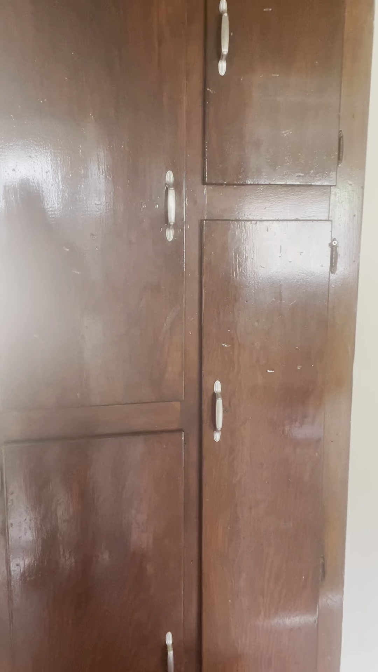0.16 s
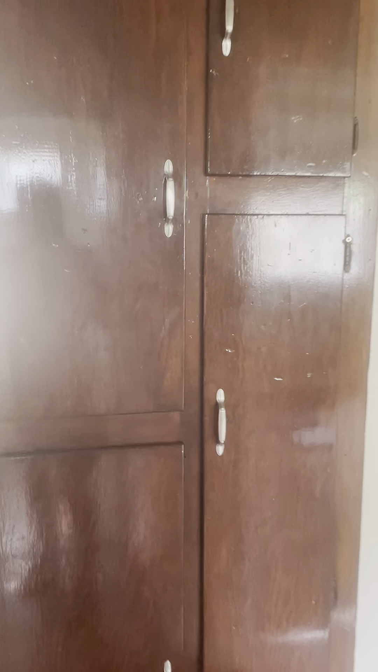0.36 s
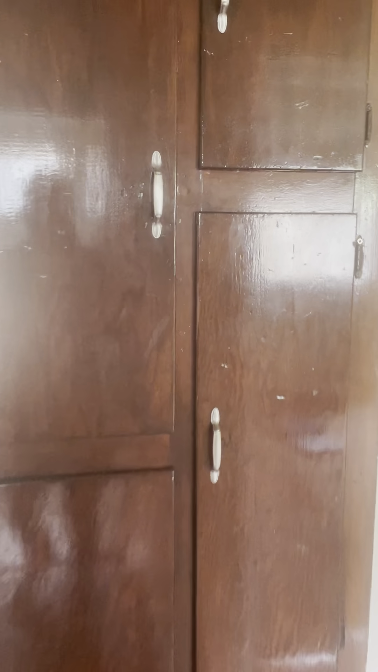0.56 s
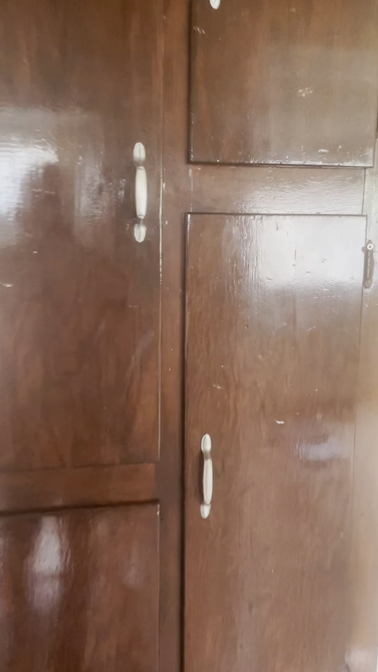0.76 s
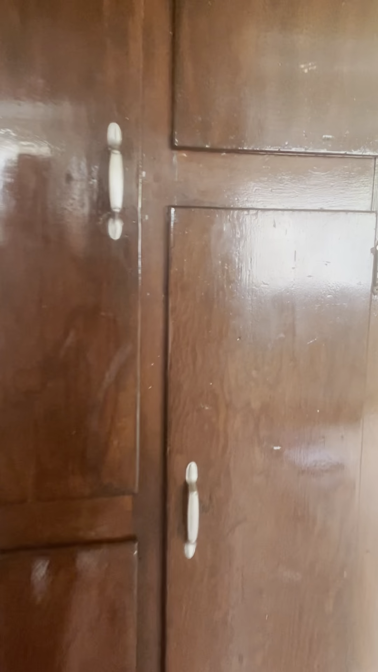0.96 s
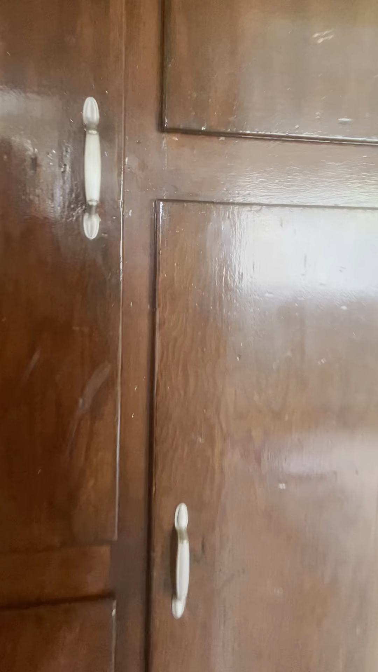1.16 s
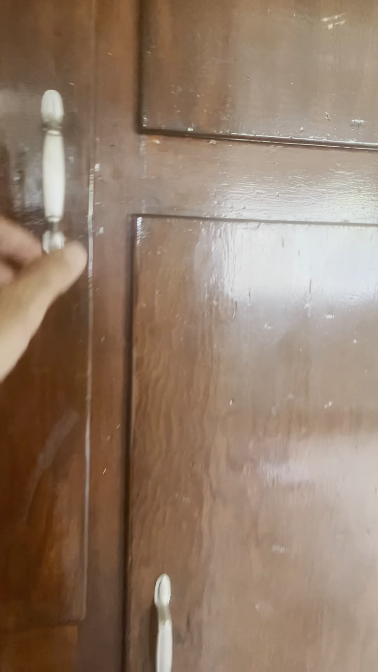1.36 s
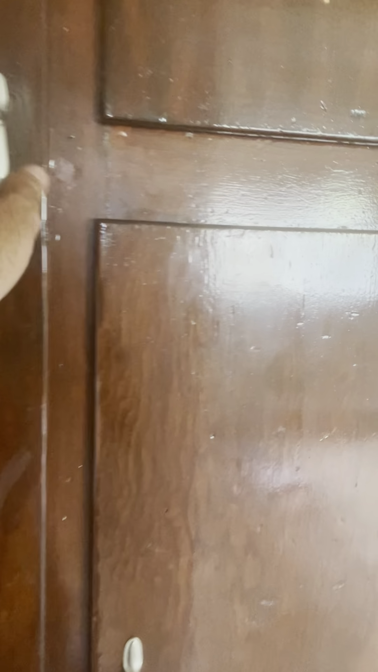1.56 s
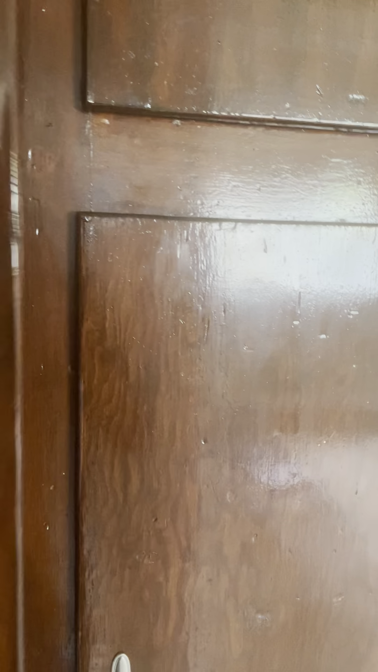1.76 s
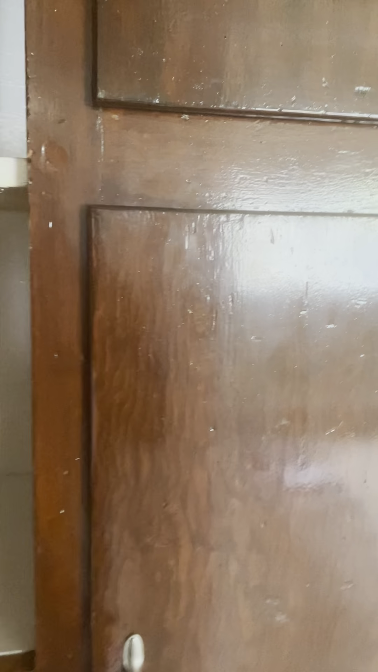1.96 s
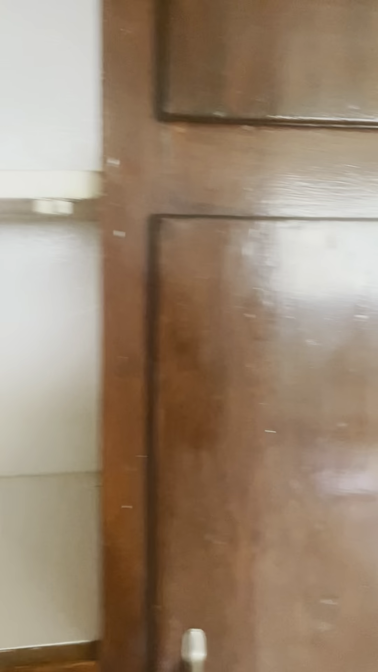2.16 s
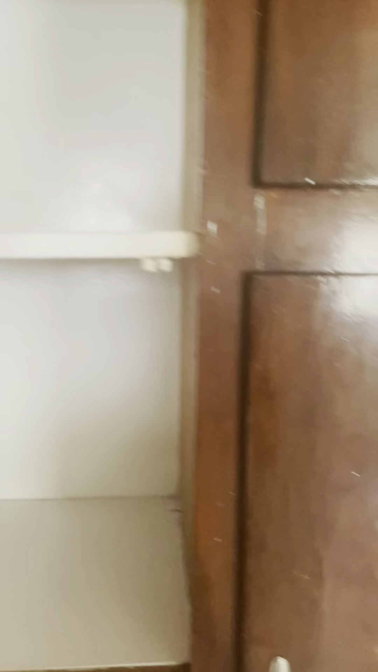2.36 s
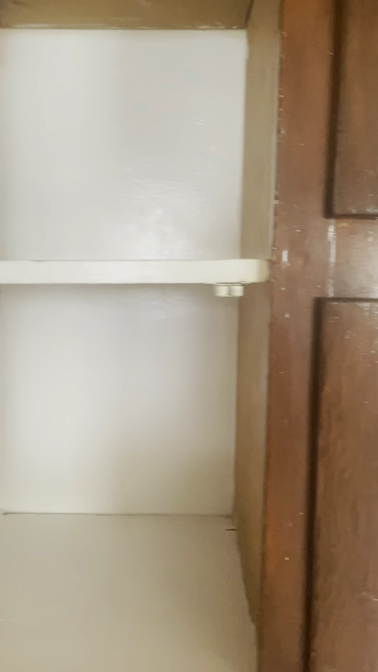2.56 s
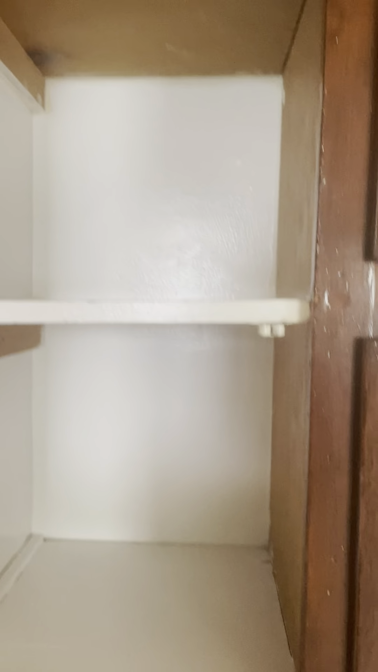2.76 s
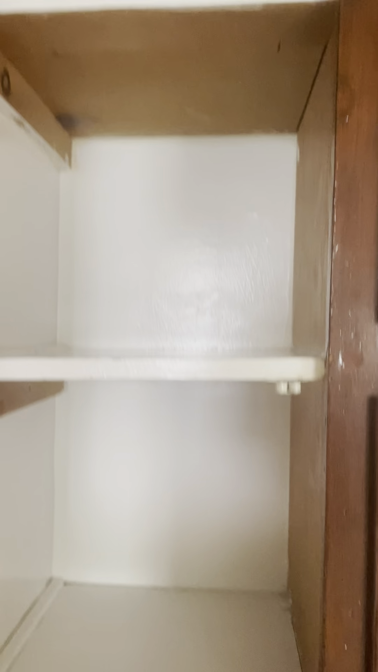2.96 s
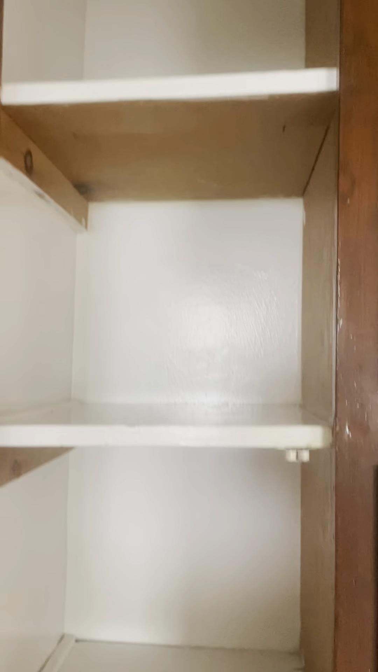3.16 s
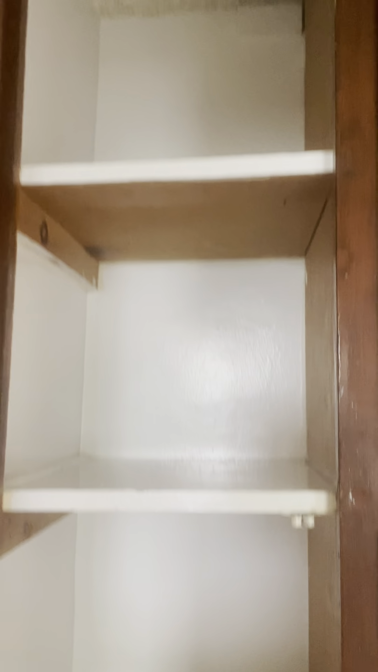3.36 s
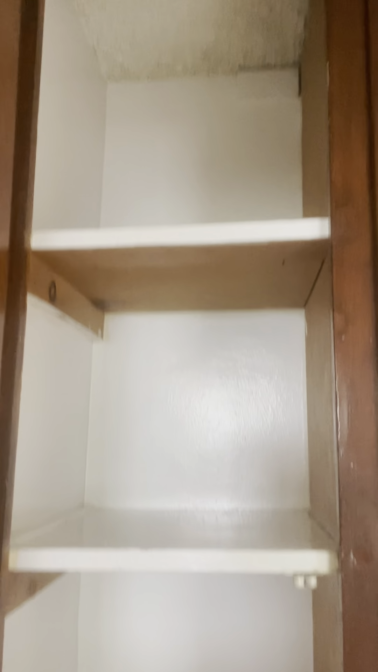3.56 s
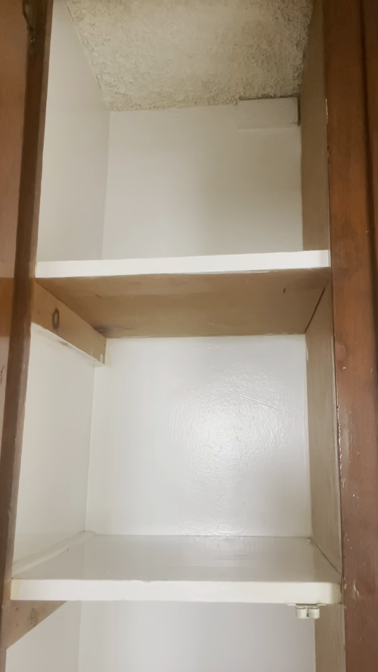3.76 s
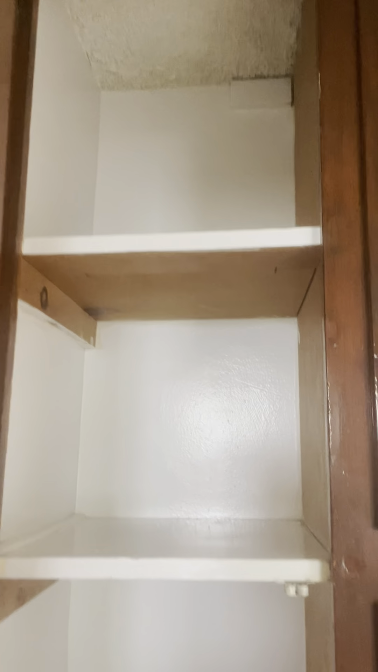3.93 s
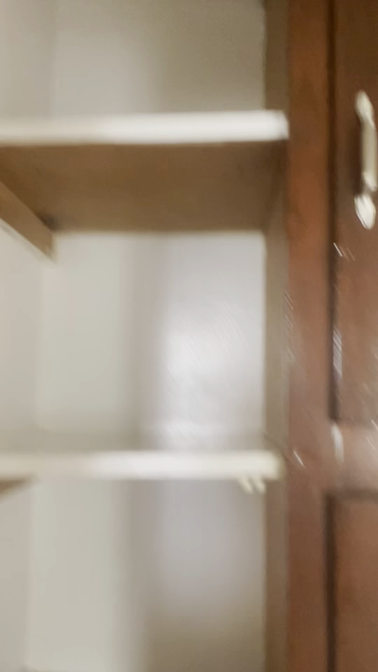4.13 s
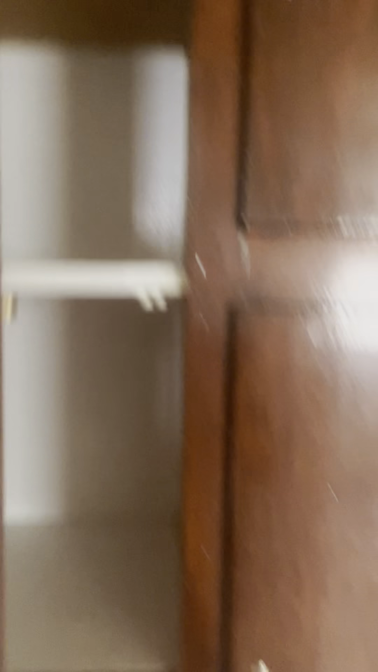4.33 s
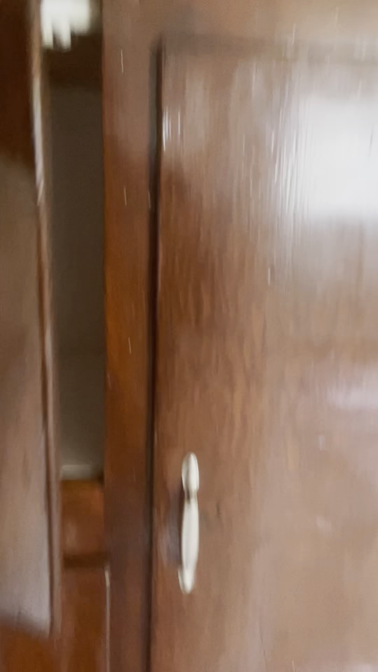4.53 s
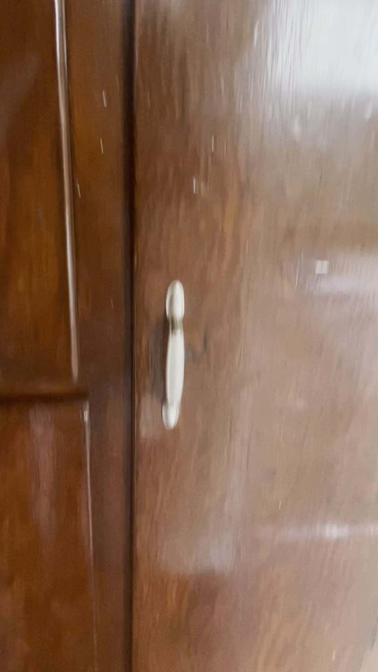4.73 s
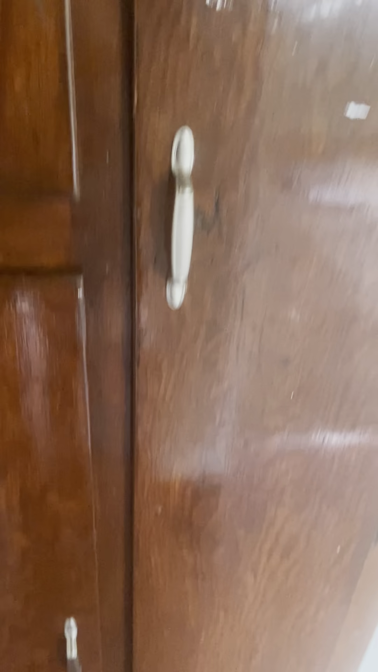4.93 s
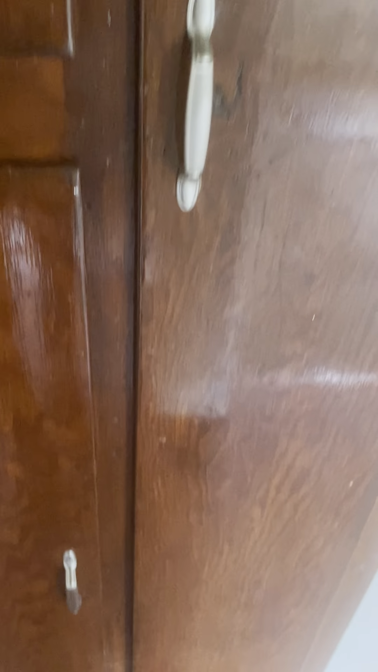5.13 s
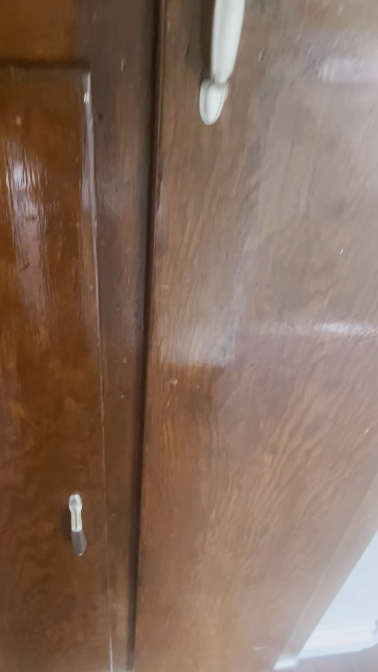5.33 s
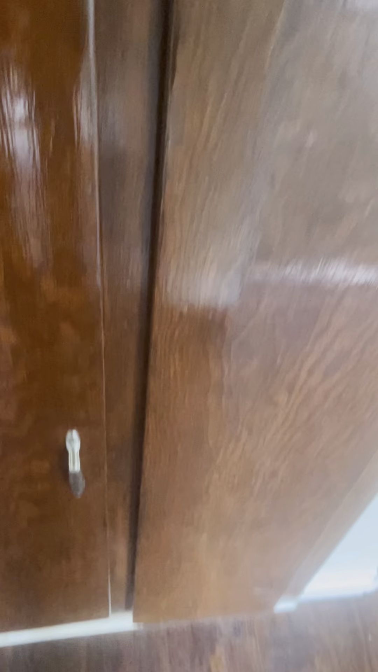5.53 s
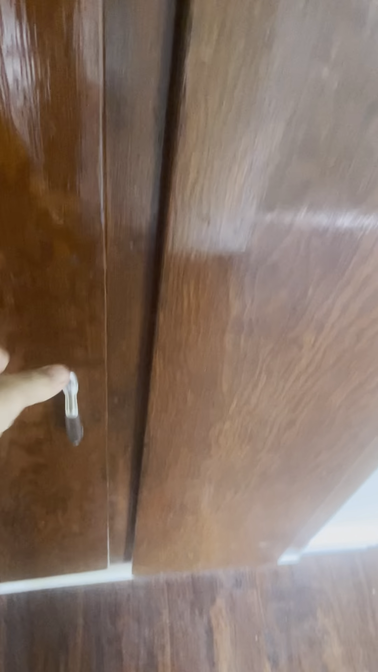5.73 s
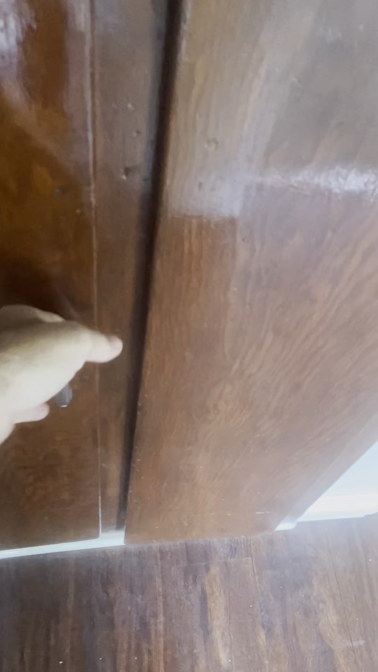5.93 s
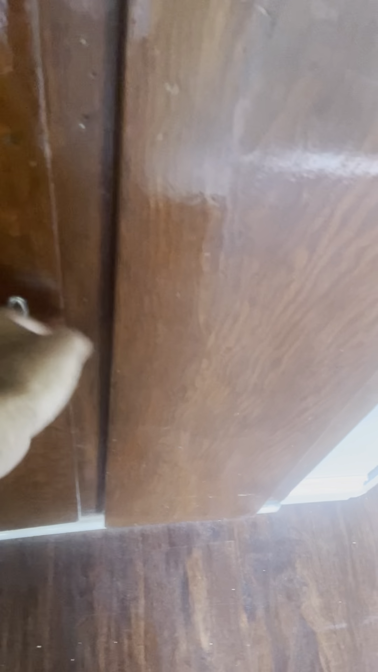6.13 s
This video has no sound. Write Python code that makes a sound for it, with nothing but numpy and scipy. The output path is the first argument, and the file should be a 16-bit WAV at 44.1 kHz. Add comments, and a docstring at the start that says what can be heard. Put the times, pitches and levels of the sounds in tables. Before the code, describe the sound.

In a bare, echoing room, floorboards tick and groan over a low house rumble. A cabinet door snaps off its catch with a bright clack, a quiet pause follows with tiny creaks, then the door bangs shut with a deep wooden boom. Another handle rattles lightly at the end. A sparrow chirps faintly outside. Close hand-held phone, stereo.

```python
"""A house rumbles and drones while floorboards groan and tick underfoot in a bare, echoing room.
Someone pulls a cabinet door off its catch, looks inside, bangs it shut, then takes another handle.
Sleeves and shoes rustle, and a sparrow chirps outside. Shaped noise makes the rumble and rustles,
ringing tones make the wood, a gliding tone makes the chirp, and decaying noise makes the echo.
Two microphone ports of a hand-held phone hear it all."""
import sys
import numpy as np
from scipy import signal
from scipy.fft import rfft, irfft, next_fast_len
from scipy.io import wavfile
from scipy.ndimage import uniform_filter1d

SR = 44100
rng = np.random.default_rng(int(sys.argv[2]) if len(sys.argv) > 2 else 0)


def bounce(signal):
    """Save signal as a 16-bit WAV file at the path given by the first command-line argument."""
    frames = np.transpose(np.atleast_2d(signal))
    limited = np.clip(frames, -1, 1)
    pcm = np.round(limited * 32767).astype(np.int16)
    wavfile.write(sys.argv[1], SR, pcm)


N = 277433  # length in samples


def amp(db):
    """Turns decibels into gain."""
    return 10 ** (np.asarray(db) / 20)


def unit(x):
    """Scales a sound to an rms (average strength) of 1."""
    return x / np.sqrt(np.mean(x ** 2) + 1e-20)


def along(points, hz):
    """Reads a curve of (Hz, value) points, with straight lines on a log frequency axis."""
    point_hz, value = np.transpose(points)
    return np.interp(np.log(hz + 1), np.log(point_hz + 1), value)


def filtered(x, response):
    """Multiplies the spectrum of x by a response that may change both level and timing."""
    size = next_fast_len(x.shape[-1] + 8192)  # spare room for ringing
    spectrum = rfft(x, size) * response(np.fft.rfftfreq(size, 1 / SR))
    return irfft(spectrum, size)[..., :x.shape[-1]]


def resonance(hz, width_hz):
    """Response of one resonance: 1 at its centre, weaker to either side."""
    return lambda f: 1j * f * width_hz / (hz * hz - f * f + 1j * f * width_hz)


# How the bare room echoes.
# Each row: frequency in Hz, time to fade by 60 dB in seconds, echo level in dB.
ROOM_ECHO = [(60, .9, -19.5), (170, 0.81, -4), (350, 0.83, -1), (715, 0.74, -1.5), (2000, 0.73, -1.5),
             (5000, 0.84, -6), (8000, 0.26, -3.5), (11700, 0.71, -9.5)]


def add(out, start_s, dry, echo_db, size=SR // 2):
    """Adds a sound and a fresh room tail; row 0 is common to both ports, row 1 differs."""
    hz, t, noise = signal.stft(rng.standard_normal((2, size)), SR, nperseg=256)
    room_hz, room_t60, room_db = np.transpose(ROOM_ECHO)
    t60 = np.interp(hz, room_hz, room_t60)[:, None]
    level_db = np.interp(hz, room_hz, room_db)[:, None]
    # dividing by the decay's own energy keeps long and short tails comparable
    gain = amp(level_db - 60 * t / t60) / np.sqrt(t60 * SR / (2 * np.log(1000)))
    gain = gain * (1 + 1.3 * amp(-60 * t / 0.21))  # the near walls answer first and louder
    tail = signal.istft(noise * gain, SR, nperseg=256)[1]
    tail = tail * (1 - np.exp(-np.arange(tail.shape[1]) / SR / 0.0025))  # the echoes build up
    sound = amp(echo_db) * signal.fftconvolve(dry[None], tail, axes=1)
    sound[0, :len(dry)] += dry
    start = round(start_s * SR)
    out[:, start:start + sound.shape[1]] += sound[:, :N - start]


def rush(spectrum, patchy_db):
    """Two unrelated noises with rms 1 overall, sharing patches of random gain in time and pitch."""
    noise = signal.stft(rng.standard_normal((2, N)), nperseg=512)[2]
    patches = uniform_filter1d(rng.standard_normal(noise.shape[1:]), 6, 0)
    patches = unit(uniform_filter1d(patches, 10, 1))
    pair = signal.istft(noise * amp(patchy_db * patches), nperseg=512)[1][:, :N]
    return unit(filtered(pair, lambda hz: amp(along(spectrum, hz))))


def shaken(blows_db, under_db, rise_s, t60_s):
    """Gain of a noise that every door contact swells and lets die; their powers add."""
    t = np.arange(N) / SR
    power = 0
    for row, blow_db in zip(DOOR_CONTACTS, blows_db):
        since = np.clip(t - row[0], 0, None)
        swell = amp(blow_db + under_db - 60 * since / t60_s) * (1 - np.exp(-since / rise_s))
        power = power + swell ** 2
    return np.sqrt(power)


# Tone colours of the house rumble, house drone, room tone, shuffling shoes and rustling sleeves.
# Each row: frequency in Hz, relative level per Hz in dB.
RUMBLE_COLOUR = [(10, -47.5), (24, -31), (36, -7), (48, -9), (62, -3.5), (78, -3.5), (95, -28.5),
                 (130, -60.5)]
DRONE_COLOUR = [(60, -51.5), (85, -4.5), (110, 0.5), (135, -2.5), (160, -8.5), (220, -22), (320, -54)]
ROOM_TONE_COLOUR = [(120, -47.5), (200, 4.5), (300, 0.5), (500, -6.5), (1000, -8.5), (1600, -15.5),
                    (2500, -77)]
SHOE_COLOUR = [(900, -54.5), (1600, 4.5), (3000, 0.5), (5000, -2.5), (7000, 1), (9000, -36)]
SLEEVE_COLOUR = [(4000, -39), (7000, -0.5), (10000, 9), (13000, 10.5), (16000, -18.5)]
# The steady layers and the stir of the person moving about.
# Each row: time in seconds, rumble level in dB, drone level in dB, stir level in dB.
BACKGROUND_LEVELS = [(0, -51.5, -47, -60.5), (.2, -53.5, -52, -67.5), (.4, -50.5, -46.5, -56.5),
                     (.9, -51, -57, -65.5), (1.07, -55, -51, -55.5), (1.23, -52, -53, -59.5),
                     (1.45, -55, -58, -56), (2.05, -53.5, -51.5, -60), (2.2, -41.5, -53.5, -62.5),
                     (2.45, -50, -63, -61.5), (3.0, -52.5, -61, -63), (3.15, -59, -62, -65),
                     (3.7, -56, -65.5, -73), (4.24, -52.5, -63, -66.5), (4.85, -53.5, -61, -68),
                     (5.6, -59, -60, -55), (6.0, -51.5, -58.5, -60), (6.29, -53, -56, -104)]
# Single rustles of sleeves and shoes.
# Each row: middle in seconds, length in seconds, sleeve level in dB, shoe level in dB.
RUSTLE_TIMES = [(0.128, 0.13, -73, -72), (0.616, 0.37, -72, -74), (0.898, 0.47, -88, -78),
                (1.097, 0.41, -67.5, -72.5), (1.497, 0.21, -53.5, -55), (1.995, 0.29, -73, -63),
                (2.437, 0.11, -90, -75), (3.4, 0.4, -74.5, -82.5), (3.9, 0.55, -78, -84.5),
                (4.396, 0.2, -93, -79.5), (4.583, 0.24, -81, -84), (5.532, 0.21, -73, -69.5),
                (5.865, 0.25, -70, -67.5), (6.27, 0.2, -70, -69)]
SHOES_DB, STIR_MEAN_DB = -80.5, -60  # shoe level when the stir is at its mean
SHOES_GROW = 1.3  # dB of shoes per dB of stir
SLEEVES_AT_REST_DB = -88


def air():
    """Five shaped noises follow the house and the person; door blows shake all but the sleeves."""
    t = np.arange(N) / SR
    at, *levels = np.transpose(BACKGROUND_LEVELS)
    rumble_db, drone_db, stir_db = [np.interp(t, at, db) for db in levels]
    sleeve_rustle, shoe_rustle = np.zeros(N), np.zeros(N)
    for middle, length, sleeve_db, shoe_db in RUSTLE_TIMES:
        bump = np.exp(-(2 * (t - middle) / length) ** 2)
        sleeve_rustle += amp(sleeve_db) * bump
        shoe_rustle += amp(shoe_db) * bump
    _, _, _, edge_db, knock_db, _, _, boom_db, _, _ = np.transpose(DOOR_CONTACTS)
    # under_db is counted from the matching part of the blow
    rumble = amp(rumble_db) + shaken(boom_db, under_db=-23.5, rise_s=0.07, t60_s=1)
    drone = amp(drone_db) + shaken(boom_db, under_db=-22, rise_s=0.03, t60_s=0.76)
    tone = amp(stir_db) + shaken(knock_db, under_db=-19, rise_s=0.01, t60_s=0.68)
    shoes = amp(SHOES_DB + SHOES_GROW * (stir_db - STIR_MEAN_DB)) + shoe_rustle
    shoes = shoes + shaken(edge_db, under_db=-25.5, rise_s=0.012, t60_s=0.21)
    sleeves = amp(SLEEVES_AT_REST_DB) + sleeve_rustle
    out = sleeves * rush(SLEEVE_COLOUR, patchy_db=4.5)
    layers = [(RUMBLE_COLOUR, rumble), (DRONE_COLOUR, drone), (ROOM_TONE_COLOUR, tone), (SHOE_COLOUR, shoes)]
    for colour, gain in layers:
        out = out + gain * rush(colour, patchy_db=1.5)
    return out


# When the sparrow calls.
# Each row: start in seconds, top pitch in Hz, level in dB before the yard smears it.
SPARROW_CALLS = [(1.238, 5510, -53.5), (3.745, 5460, -54.5), (4.528, 5595, -52), (5.946, 5550, -55.5)]
# The shape of one chirp.
# Each row: time into the chirp in seconds, share of the top pitch, level in dB within the chirp.
CHIRP_SHAPE = [(0, .78, -17), (.008, .9, -10), (.013, 1.0, -2), (.028, .99, 0), (.035, .93, -4),
               (.045, .84, -10), (.057, .75, -16), (.07, .67, -22), (.085, .6, -30)]


def sparrow():
    """A tone jumps up, holds and falls; yard walls and window smear it before the room echoes it."""
    out = np.zeros((2, N))
    at, share, shape_db = np.transpose(CHIRP_SHAPE)
    t = np.arange(round(at[-1] * SR)) / SR
    for start_s, top_hz, db in SPARROW_CALLS:
        phase = 2 * np.pi * np.cumsum(top_hz * np.interp(t, at, share)) / SR
        loudness = amp(db + np.interp(t, at, shape_db)) * signal.windows.tukey(len(t), 0.1)
        call = loudness * np.sin(phase)
        yard = rng.standard_normal(len(t)) * amp(-60 * t / 0.054)
        smeared = signal.fftconvolve(call, yard / np.linalg.norm(yard))
        add(out, start_s, smeared, echo_db=12.0)
    return out


def peak(x):
    """Scales a sound so its highest peak is 1."""
    return x / np.abs(x).max()


def contact(click_db, click_hz, edge_db, knock_db, knock_hz, knock_t60, t60, attack):
    """Micro-impacts ring a bright resonance and spit a broad edge; the blow rings three dull modes."""
    t = np.arange(SR // 5) / SR
    fade = amp(-60 * t / np.clip(t60, 0.003, 0.2)) * (1 - np.exp(-t / attack))
    impacts = rng.standard_normal((2, len(t))) * fade
    bright = resonance(click_hz, 0.51 * click_hz)
    click = filtered(impacts[0], lambda f: bright(f) ** 2)
    edge = filtered(impacts[1], resonance(2500, 15000))
    # slow random gain: the wood rings unevenly
    wobble = filtered(rng.standard_normal(len(t)), lambda f: np.exp(-(f / (0.21 * knock_hz)) ** 2))
    grain = 1 + 0.68 * unit(wobble)
    turn = 2 * np.pi * knock_hz * t
    modes = np.sin(turn) + 0.23 * np.sin(1.22 * turn) + 0.39 * np.sin(0.7 * turn)
    knock_fade = amp(-60 * t / np.clip(knock_t60, 0.01, 0.3)) * (1 - np.exp(-t / 0.00047))
    knock = modes * grain * knock_fade
    return amp(click_db) * peak(click) + amp(edge_db) * peak(edge) + amp(knock_db) * peak(knock)


# Floorboard ticks under the feet.
# Each row: start in seconds, click level in dB, edge level in dB, knock level in dB,
# knock pitch in Hz, echo level in dB.
BOARD_TICKS = [(.318, -56.5, -75, -29, 524, -0.5), (.390, -42.5, -49.5, -32.5, 430, -5.5),
               (.644, -65, -78, -47.5, 450, 2), (.820, -53.5, -65, -59, 900, 2),
               (1.024, -54, -73, -35.5, 546, -3), (1.161, -55, -61.5, -29, 500, -5.5),
               (2.175, -65, -50, -68, 303, 2.5), (2.300, -74, -53.5, -51.5, 410, 4),
               (2.412, -75, -57, -54.5, 538, 7), (2.440, -68, -52.5, -54.5, 380, -8),
               (2.550, -77, -68.5, -55, 370, -1), (2.726, -74, -53.5, -68, 1490, 4.5),
               (2.822, -80, -53, -53, 473, 2), (3.077, -64.5, -49.5, -55.5, 506, 0.5),
               (3.266, -77, -63, -79, 400, -2), (3.292, -65, -56, -60.5, 880, -1.5),
               (3.379, -74.5, -55, -58.5, 620, 3), (3.889, -76, -49.5, -57, 668, 0),
               (4.030, -65, -63, -77, 700, -3), (4.155, -77, -52.5, -58.5, 494, 5),
               (4.228, -63, -73, -68, 920, -4), (4.788, -70.5, -64, -65, 913, 12.5),
               (4.840, -69, -56.5, -60, 497, -5), (4.945, -65.5, -64, -58, 480, 9.5),
               (5.540, -56, -51.5, -47, 695, -14)]
# Wood groaning under slow load or scuffed by a hand.
# Each row: start in seconds, length in seconds, pitch in Hz, resonance width in Hz, level in dB.
WOOD_GROANS = [(.037, 0.24, 471, 62, -59), (1.35, .1, 494, 63, -51), (2.4, 0.41, 390, 30, -69.5),
               (2.76, .3, 1580, 90, -75), (1.41, 0.17, 4400, 5300, -56), (4.22, 0.43, 1140, 110, -76),
               (4.201, 0.43, 2040, 550, -81), (2.7, 0.6, 4100, 298, -86.5), (3.3, 0.24, 950, 200, -75),
               (4.8, 0.19, 500, 50, -71.5), (5.68, 0.29, 490, 60, -60), (5.7, 0.4, 770, 76, -62)]


def floorboards():
    """Short ticks as boards slip, and longer groans where slips crowd into one resonance."""
    out = np.zeros((2, N))
    for start_s, click_db, edge_db, knock_db, knock_hz, echo_db in BOARD_TICKS:
        tick = contact(click_db, 2224, edge_db, knock_db, knock_hz, knock_t60=0.049, t60=0.051, attack=0.0013)
        add(out, start_s, tick, echo_db)
    for start_s, length, hz, width_hz, db in WOOD_GROANS:
        u = np.linspace(0, 1, round(length * SR))
        slips = rng.standard_normal(len(u)) * (rng.random(len(u)) < 0.01)  # about 1 sample in 100
        ring = filtered(slips, resonance(hz, width_hz))
        ring = filtered(ring, resonance(hz, 3 * width_hz))
        swell = np.sin(np.pi * u ** 0.35) ** 0.5  # rises early, dies slowly
        add(out, start_s, amp(db) * unit(ring) * swell, echo_db=0.5)
    return out


# Contacts of door, catch and handle; the knock's fade time is held between 0.01 and 0.3 s.
# Each row: start in seconds, click level in dB, click pitch in Hz, edge level in dB, knock level in dB,
# knock pitch in Hz, knock time to fade by 60 dB in seconds, boom level in dB (before a 5.5 dB cut),
# boom centre in Hz, echo level in dB.
DOOR_CONTACTS = [(1.522, -70.5, 2840, -73, -40, 300, 0.055, -32, 150, 6),
                 (1.543, -40, 2320, -46, -33, 600, .05, -19.5, 85, -5),
                 (1.558, -44.5, 2740, -52, -31.5, 760, 0.018, -25.5, 175, -4),
                 (1.689, -55.5, 3460, -46, -51.5, 400, .04, -53.5, 150, 17.5),
                 (1.716, -23, 5600, -16.5, -28.5, 1127, 0.052, -50.5, 202, -1),
                 (1.738, -30, 4400, -11.5, -26.5, 500, 0.12, -16.5, 160.6, -7.5),
                 (1.748, -24, 2200, -27, -23, 931, 0.12, -39, 250, -3.5),
                 (1.761, -29.5, 2570, -29.5, -29, 472, 0.24, -31, 100.7, -6.5),
                 (2.032, -52, 3340, -28.5, -41, 632, 0.24, -36, 148, -4.5),
                 (2.036, -64, 4460, -59, -42, 1485, 0.082, -64, 148, -13),
                 (5.013, -46, 2160, -51, -49.5, 1110, 0.014, -42, 150, 10),
                 (5.040, -58.5, 2830, -54, -55.5, 930, 0.033, -70, 151, 20),
                 (5.057, -64, 2060, -81, -38, 462, 0.11, -13.5, 125, 4.5),
                 (5.089, -22.5, 2420, -27.5, -20.5, 1520, 0.0073, -6, 186, 0),
                 (5.100, -24.5, 2570, -15, -21.5, 952, 0.039, -11.5, 129, 1),
                 (5.113, -22, 2250, -29, -18, 802, 0.061, -23.5, 92, -5),
                 (5.134, -37, 4640, -17.5, -20, 451, 0.067, -21.5, 260, -2),
                 (5.150, -34, 2400, -36, -27, 670, .067, -16.5, 115, -2),
                 (5.172, -28.5, 5140, -35, -22.5, 457, 0.42, -32, 106, -13),
                 (5.951, -54, 1710, -44.5, -47, 1000, 0.024, -50, 150, 7.5),
                 (5.972, -61, 1870, -71, -42.5, 529, 0.066, -36.5, 160, 7.5),
                 (5.989, -37.5, 2530, -39, -42, 457, 0.068, -50, 160, -5),
                 (6.005, -48, 2720, -41, -44.5, 1150, 0.084, -32, 95, -4),
                 (6.106, -30, 3220, -38, -33.5, 1328, 0.18, -40, 253, -9.5),
                 (6.12, -41.5, 2870, -54, -42.5, 340, 0.11, -31.5, 92, -24),
                 (6.144, -47.5, 3030, -55, -48, 707, 0.071, -41, 91.5, -8),
                 (6.192, -55, 3040, -41.5, -53.5, 1290, 0.034, -40.5, 146, -2)]
# Ringing modes of the door panel and the cabinet body.
# Each row: pitch in Hz, relative level in dB, time to fade by 60 dB in seconds.
PANEL_MODES = [(42.6, -17, .45), (78.8, -1.5, 0.65), (98.6, -1, 0.13), (118, -2, 0.15), (152.34, -2, 0.37),
               (172.2, -6, 0.27), (204.7, -10, 0.38), (251.5, -8.5, .35), (294.5, -11.5, 0.44),
               (316.2, -4.5, 0.23)]


def door():
    """Each contact clicks and knocks; the panel modes nearest the blow's centre boom most."""
    out = np.zeros((2, N))
    t = np.arange(SR // 2) / SR
    for start_s, *blow, boom_db, centre_hz, echo_db in DOOR_CONTACTS:
        boom = np.zeros(len(t))
        for hz, db, t60 in PANEL_MODES:
            reach_db = -7 * np.log2(hz / centre_hz) ** 2 + rng.normal(0, 0.76)
            boom += amp(db + reach_db - 60 * t / t60) * np.sin(2 * np.pi * hz * t)
        sound = -amp(boom_db - 5.5) * boom * (1 - np.exp(-t / 0.0029))
        sound[:SR // 5] += contact(*blow, t60=0.043, attack=0.00027)
        add(out, start_s, sound, echo_db, size=SR)
    return out


# The part of the sound that differs between the ports.
# Each row: frequency in Hz, level in dB.
PORT_DIFFERENCE = [(60, -34.5), (200, -20.5), (400, -10), (700, -3.5), (1300, -6.5), (2400, -6.5),
                   (4400, -5), (9000, -10), (15000, -13)]
# How early the left port hears.
# Each row: frequency in Hz, lead of left over right in microseconds.
LEFT_LEAD = [(2000, 65), (4000, 51), (7000, 34), (10000, 83), (13000, 100), (16000, 100)]
# Loudness balance of the ports.
# Each row: frequency in Hz, left minus right in dB.
LEFT_TILT = [(60, 0.5), (150, 0), (380, 1.0), (950, 1.5), (2380, 0), (5980, 0.5), (15000, -0.5)]


def scene():
    """The ports hear the bass alike and the treble less so; the left one is nearer and hears first."""
    mid, other = door() + floorboards() + sparrow() + air()
    side = filtered(other, lambda hz: amp(along(PORT_DIFFERENCE, hz)))

    def left_and_right(hz):
        # each port takes half of the lead and half of the tilt
        lead = np.exp(1j * np.pi * np.outer([1, -1], hz * along(LEFT_LEAD, hz) / 1e6))
        return lead * amp(np.outer([0.5, -0.5], along(LEFT_TILT, hz)))

    return filtered(np.array([mid + side, mid - side]), left_and_right)


# How well the ports hear each pitch.
# Each row: frequency in Hz, gain in dB.
PORT_RESPONSE = [(20, 0.5), (5500, 0), (6600, -8), (7600, -27), (8600, -4), (10000, -12.5), (12000, -17.5),
                 (14300, -20), (15400, -4), (16000, -10)]
TOP_HZ = 15870  # band limit


def record(dry):
    """The ports notch the treble twice; nothing passes from the band limit up."""
    return filtered(dry, lambda hz: amp(along(PORT_RESPONSE, hz)) * (hz < TOP_HZ))


dry = scene()
out = record(dry)
bounce(out)
```